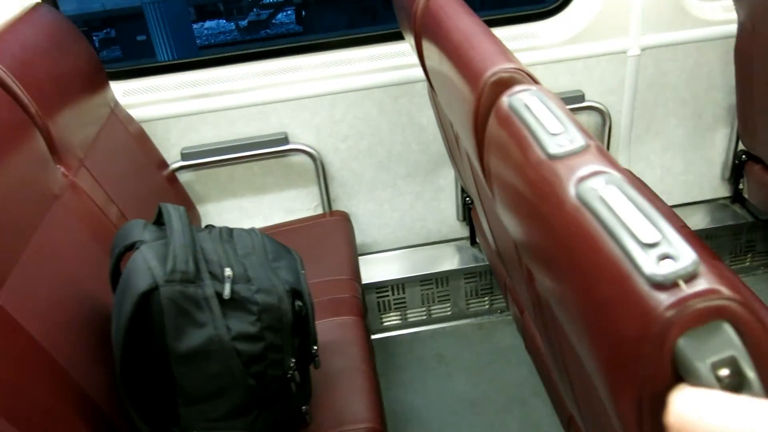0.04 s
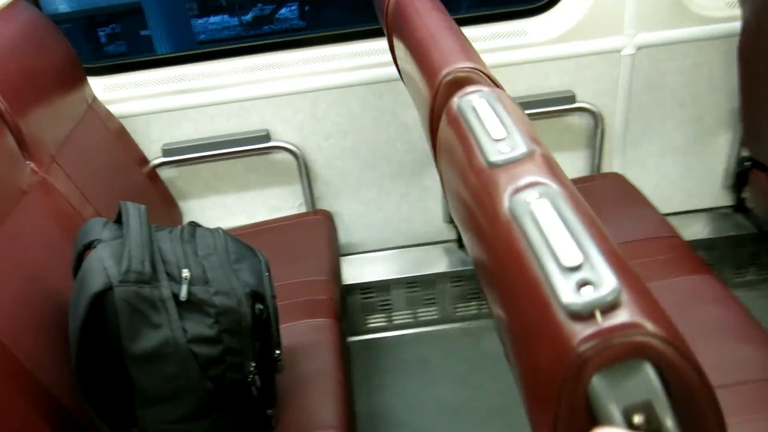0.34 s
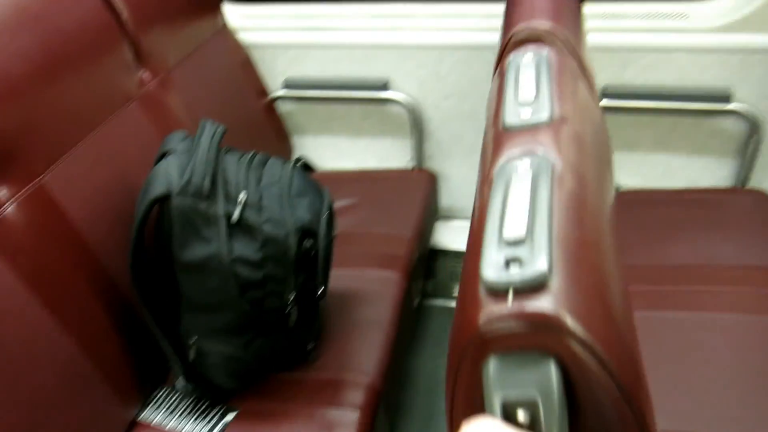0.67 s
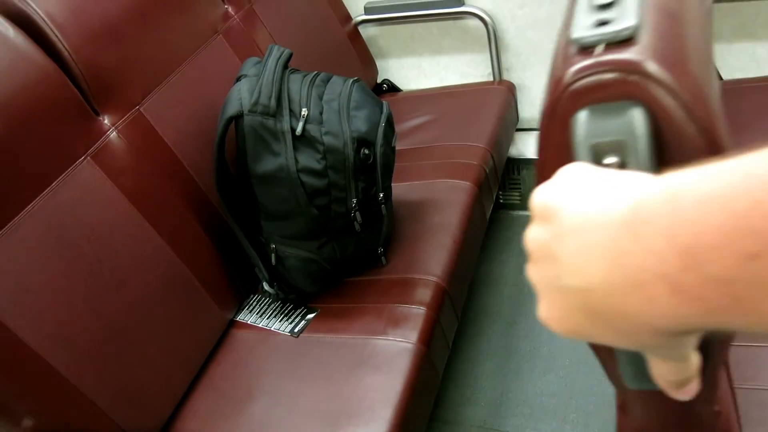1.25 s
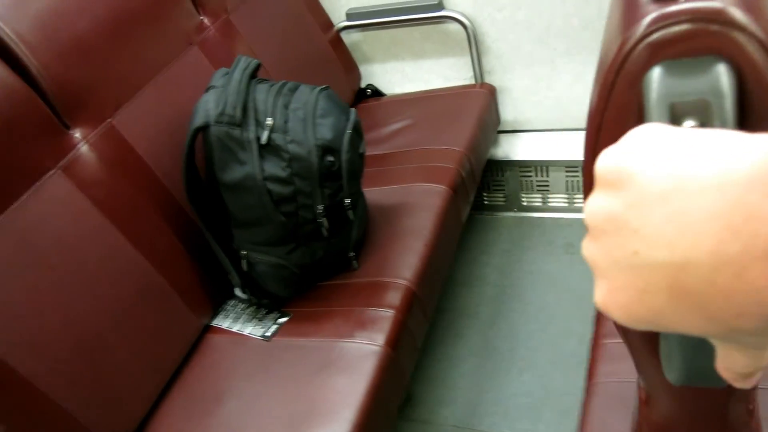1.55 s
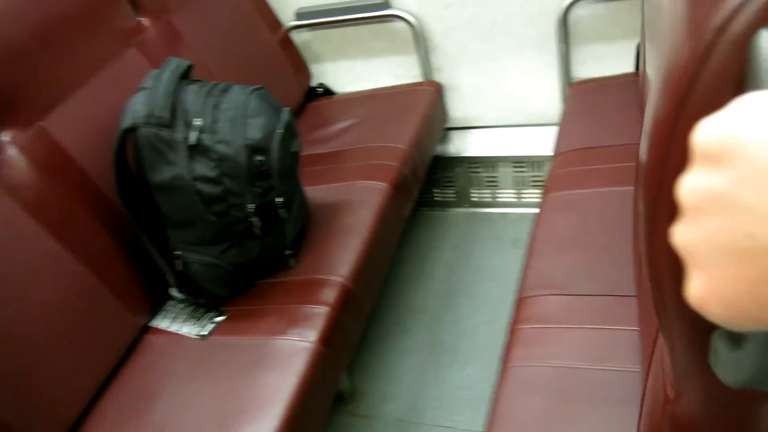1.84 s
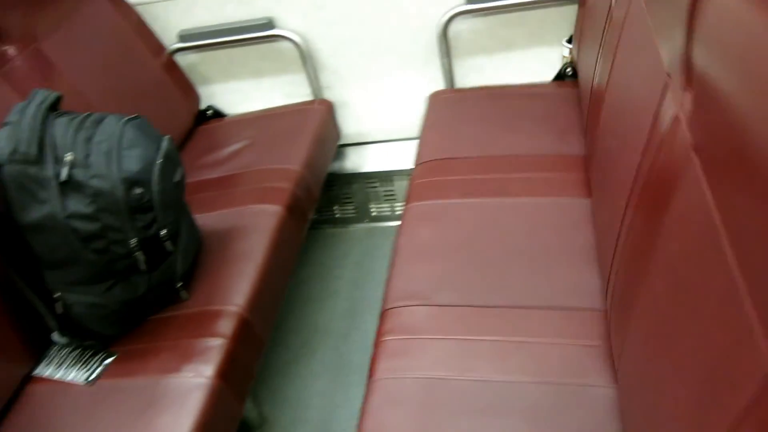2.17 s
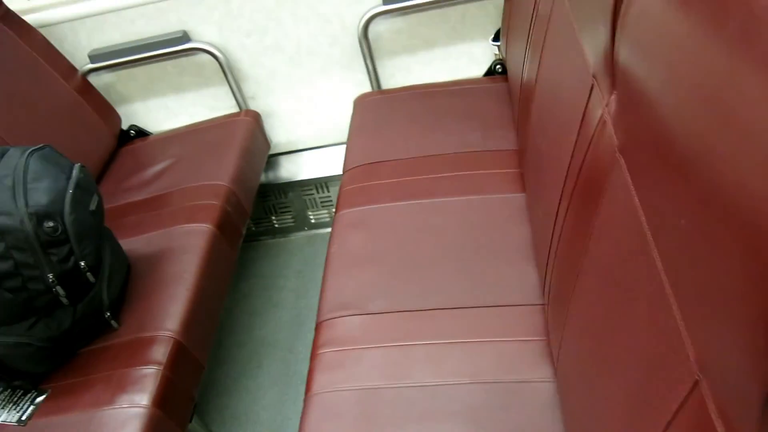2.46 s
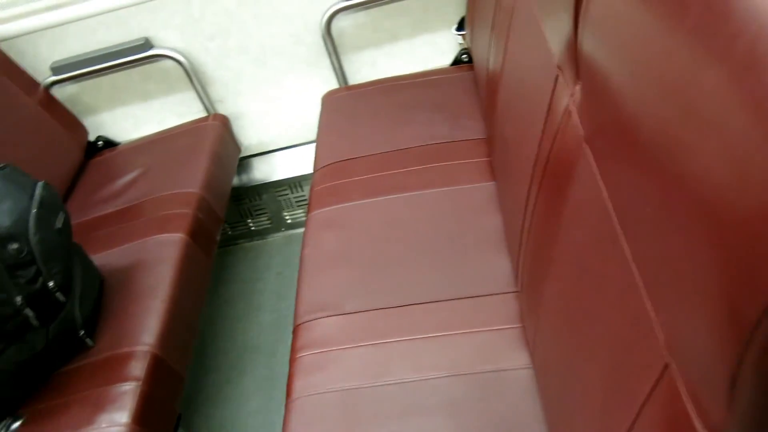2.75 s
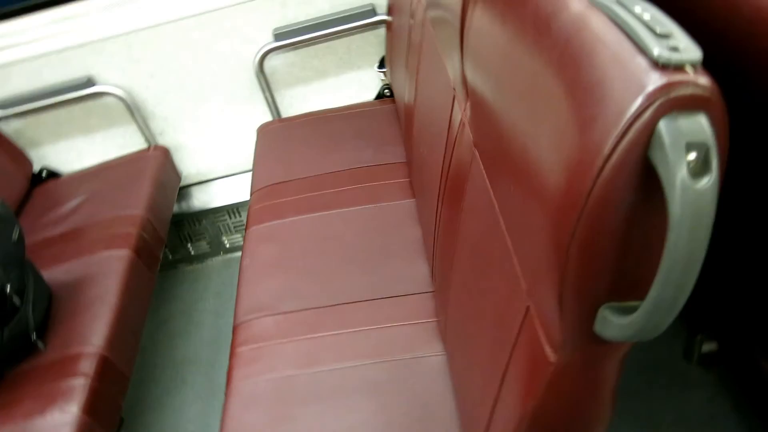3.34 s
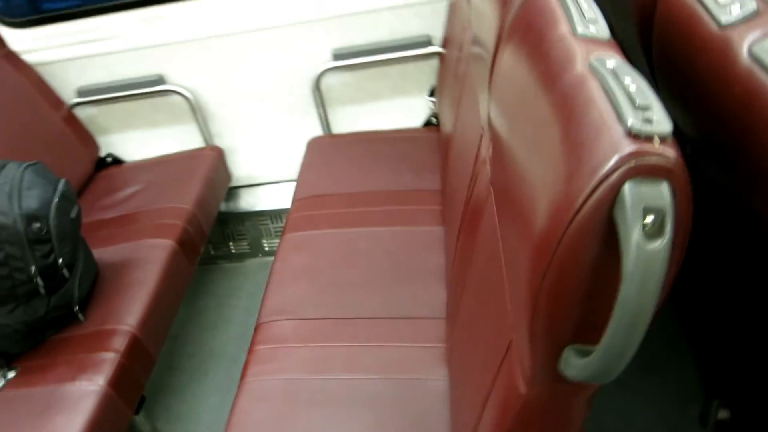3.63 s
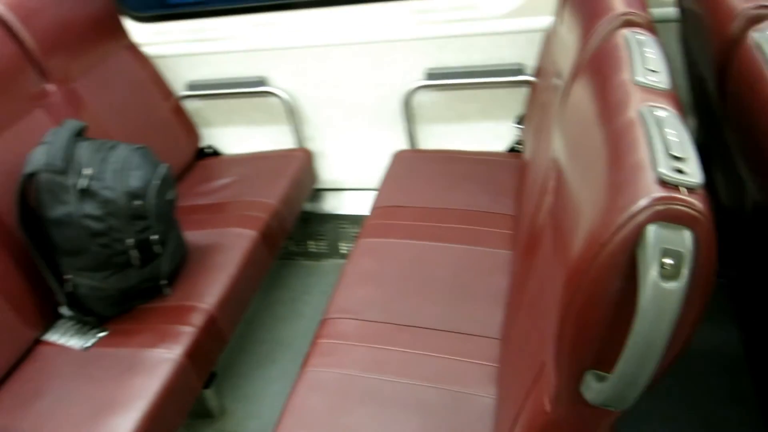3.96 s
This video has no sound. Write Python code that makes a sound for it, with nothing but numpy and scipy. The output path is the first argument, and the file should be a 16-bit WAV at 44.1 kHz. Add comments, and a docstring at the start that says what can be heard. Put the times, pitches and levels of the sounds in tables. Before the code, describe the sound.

A train seat back is swung over, sliding with a faint scrape and a few high squeaks, then landing with a loud rattling clunk and small settling knocks. The moving car rumbles steadily around the nearby microphone.

```python
"""Swinging a train seat back over

Inside a moving rail car, on a camera's stereo microphone, a reversible seat back is swung by its handle.
It slides with a hiss and a scrape, its dry pivots squeal, and it lands with a rattling clunk and settles.
The car rumbles throughout; the camera's gain control ducks it after the squeal and the clunk."""
import sys
import numpy as np
from scipy import signal
from scipy.fft import rfft, irfft
from scipy.io import wavfile
from scipy.ndimage import uniform_filter1d, minimum_filter1d

SR = 44100
rng = np.random.default_rng(int(sys.argv[2]) if len(sys.argv) > 2 else 0)


def dump(signal):
    """Clip the signal to [-1, 1] and save it as 16-bit WAV at the path in sys.argv[1]."""
    limited = np.clip(np.atleast_2d(signal).T, -1, 1)
    pcm = np.round(limited * 32767).astype(np.int16)
    wavfile.write(sys.argv[1], SR, pcm)


N = 176400
BIN_HZ = np.fft.rfftfreq(N, 1 / SR)


def amp(db):
    """Decibels to gain."""
    return 10 ** (np.asarray(db) / 20)


def unit(x):
    """Scales to rms 1."""
    return x / np.sqrt(np.mean(x ** 2) + 1e-20)


def at_hz(points, hz=BIN_HZ):
    """Reads a table on a log-frequency axis."""
    f, value = np.transpose(points)
    return np.interp(np.log(hz + 1), np.log(f + 1), value)


def level(points):
    """Gain over time from points of (time [s], level [dB])."""
    return amp(np.interp(np.arange(N) / SR, *np.transpose(points)))


def add(mix, start_s, sound):
    """Mixes a sound in at its start time."""
    part = mix[..., round(start_s * SR):][..., :sound.shape[-1]]
    part += sound[..., :part.shape[-1]]


def wander(hz):
    """Random motion of rms 1, up to the given rate."""
    return unit(irfft(rfft(rng.standard_normal(N)) / (1 + (BIN_HZ / hz) ** 8), N))


def through(x, response):
    """Convolves with a response scaled to energy 1."""
    response = np.atleast_2d(response)
    return signal.fftconvolve(x, response / np.linalg.norm(response[0]), axes=1)[:, :N]


def colour(points, size=4096):
    """Minimum-phase impulse response with a given spectrum."""
    log_gain = np.log(amp(at_hz(points, abs(np.fft.fftfreq(size, 1 / SR)))))
    return np.fft.ifft(np.exp(np.conj(signal.hilbert(log_gain)))).real[:size // 2]


# Likeness of the two microphone channels: (frequency [Hz], correlation [-1 to 1])
MIC_LIKENESS = [(50, 0.74), (130, 1), (300, 0.84), (600, .5), (1500, 0.37), (4000, .5), (12000, -0.06)]
# Balance at the microphone: (frequency [Hz], left minus right [dB])
MIC_BALANCE = [(40, -1), (250, -3), (700, 1), (4000, 0.5), (12000, -2.5)]


def stereo_noise(gain):
    """Steady noise of rms 1 with a given spectrum, as the stereo microphone hears it."""
    left, independent = rfft(rng.standard_normal((2, N)))
    likeness = np.clip(at_hz(MIC_LIKENESS), -1, 1)
    right = likeness * left + np.sqrt(1 - likeness ** 2) * independent
    tilt = amp(at_hz(MIC_BALANCE) / 2)
    return unit(irfft(np.array([left * tilt, right / tilt]) * gain, N))


# Rumble of the car, heard from inside: (frequency [Hz], relative density [dB])
RUMBLE_SPECTRUM = [(12, -34), (20, -14), (104, -3), (120, -4.5), (154, -8), (198, -0.5), (270, -1.5),
                   (306, -4.5), (431, -12.5), (472, -13), (586, -23), (630, -20.5), (769, -27.5),
                   (888, -26.5), (1500, -42), (1950, -55), (3300, -120)]
# Running gear over the rumble: (frequency [Hz], width [Hz], first level [dB], last level [dB])
GEAR_DRONES = [(112.2, 9.5, -8.5, -17), (240, 34, -8, -12.5), (291, 103, -21, -5.5)]
# Air noise around the microphone: (frequency [Hz], relative density [dB])
AIR_SPECTRUM = [(710, -37), (1200, -6.5), (1320, -5), (1470, -4.5), (2480, -6.5), (2730, -9), (6580, -14.5),
                (14700, -23.5), (16000, -38)]
# Swell of all three together: (time [s], level [dB])
CAR_LEVEL = [(0, -18), (.35, -18), (.8, -16), (1.1, -17), (1.4, -14.5), (1.9, -12.5), (2.4, -18.5),
             (3.0, -19.5), (3.6, -21), (4, -21)]


def running_car(air_db=-21):
    """Rumble, drones and air noise swell and ease together; the drones slowly trade strength."""
    drones = np.zeros((2, N))
    for hz, width_hz, first_db, last_db in GEAR_DRONES:
        resonance = 1 / (1 + (2 * (BIN_HZ - hz) / width_hz) ** 2)
        drones += amp(np.linspace(first_db, last_db, N)) * stereo_noise(resonance)
    rumble = stereo_noise(amp(at_hz(RUMBLE_SPECTRUM)))
    air = amp(air_db) * stereo_noise(amp(at_hz(AIR_SPECTRUM)))
    return level(CAR_LEVEL) * (rumble + drones + air)


# Hiss of the upholstery and lower scrape of the rails: (frequency [Hz], relative density [dB])
HISS_SPECTRUM = [(600, -7), (2200, -0.5), (3200, -3.5), (4800, -0.5), (7500, -6.5), (11500, -3),
                 (15500, -17)]
SCRAPE_SPECTRUM = [(200, -16), (550, 0.5), (1100, 3), (1500, -8), (2200, -5.5), (3200, -20), (8000, -35)]
# Upholstery and rails at the microphone: (time [s], level [dB])
UPHOLSTERY_LEVEL = [(0, -44.5), (.2, -41), (.38, -49.5), (.52, -38), (.7, -35), (.87, -35), (.95, -41.5),
                    (1.02, -41), (1.12, -43), (1.55, -42), (1.8, -35), (1.92, -30), (2.05, -30),
                    (2.15, -3.5), (2.4, -71)]
RAIL_LEVEL = [(0, -46), (.42, -43), (.52, -36.5), (.64, -34.5), (.75, -47), (1.1, -38.5), (1.6, -35),
              (1.85, -32.5), (2.05, -24), (2.3, -67)]


def seat_slide(flicker_db=1, flicker_hz=43):
    """Uneven friction hisses and scrapes while the seat back travels."""
    hiss = level(UPHOLSTERY_LEVEL) * stereo_noise(amp(at_hz(HISS_SPECTRUM)))
    scrape = level(RAIL_LEVEL) * stereo_noise(amp(at_hz(SCRAPE_SPECTRUM)))
    return amp(flicker_db * wander(flicker_hz)) * (hiss + scrape)


# Dry pivots, mostly right of the microphone: (start [s], length [s], first pitch [Hz], last pitch [Hz],
# level [dB], roughness [0-1], second harmonic [dB], third harmonic [dB], left minus right [dB],
# reflections over direct sound [dB])
PIVOT_SQUEALS = [(1.15, 0.018, 4810, 4916, 4.5, 0.42, -11, -13, -0.5, 4),
                 (1.177, 0.033, 4930, 4974, 2, 0.43, -12, -26.5, -2.5, 1.5),
                 (1.208, 0.11, 5050, 4944, -16, 0.27, -21, -45, -3, -2),
                 (1.523, 0.018, 4595, 4410, -33, 0, -1.5, -13, 3, -10.5),
                 (1.55, 0.022, 4530, 4340, -20, 0.12, -10, -20, -1, 4.5),
                 (1.593, 0.082, 4140, 3990, -23.5, .06, -9.5, -28, -2, 2),
                 (1.998, .035, 4704, 4720, -23, .5, -34, -30, -0.5, 5.5),
                 (2.072, 0.057, 7950, 7887, -8.5, 0.14, -26, -40, -4, 2),
                 (2.105, 0.034, 8900, 9030, -20, 0.4, -35, -40, -10, 9)]


def pivot_squeals(jitter_hz=300, chatter_hz=765, rise_share=0.27, fall_s=0.01):
    """A pivot sticks and slips at a gliding pitch; roughness shakes its pitch and strength."""
    direct, to_room = np.zeros((2, 2, N))
    for start, length, first_hz, last_hz, db, rough, second_db, third_db, pan_db, room_db in PIVOT_SQUEALS:
        t = np.arange(0, length, 1 / SR)
        jitter = (0.027 * wander(jitter_hz) + 0.058 * wander(chatter_hz))[:len(t)]
        flutter = 1 + 0.44 * rough * wander(chatter_hz)[:len(t)]
        glide_hz = first_hz + (last_hz - first_hz) * t / length
        phase = 2 * np.pi * np.cumsum(glide_hz * (1 + rough * jitter)) / SR
        tone = np.sin(phase) + amp(second_db) * np.sin(2 * phase)
        if 3 * first_hz < SR / 2:
            tone += amp(third_db) * np.sin(3 * phase)
        envelope = np.minimum(t / (rise_share * length), 1) * np.minimum((length - t) / fall_s, 1)
        channel_gain = amp([[db + pan_db / 2], [db - pan_db / 2]])
        squeal = channel_gain * envelope * unit(tone * flutter)
        add(direct, start, squeal)
        add(to_room, start, amp(room_db) * squeal)
    return direct + car_reflections(to_room, likeness=0.15)


# Reverberation inside the car: (frequency [Hz], time to fall 60 dB [s])
CAR_DECAY = [(100, 0.17), (400, 0.19), (1000, 0.51), (2500, .58), (5000, 0.61), (10000, 0.47),
             (15000, 0.58)]


def car_reflections(sound, likeness, gap_s=0.0035):
    """Dense reflections reach the microphone after a short gap, each band dying at its own speed."""
    left, independent = rng.standard_normal((2, SR))
    right = likeness * left + np.sqrt(1 - likeness ** 2) * independent
    hz, t, bands = signal.stft([left, right], SR, nperseg=256)
    decay = amp(-60 * t / at_hz(CAR_DECAY, hz)[:, None])
    tail = signal.istft(bands * decay, SR, nperseg=256)[1]
    onset = np.clip(np.arange(tail.shape[1]) / SR / gap_s - 1, 0, 1)
    return through(sound, tail * onset)


# The seat landing and settling, centred on the microphone: (time [s], level [dB], relative thud [dB],
# relative clash [dB], rattle decay [s], hollow note [Hz], relative hollow level [dB])
SEAT_KNOCKS = [(1.925, -23.5, -2, -9, 0.023, 845, -2), (2.018, -18, 1, -21, 0.019, 1090, -1),
               (2.072, -8, -2.5, -34, 0.0022, 833, 2.5), (2.116, -23.5, -23, 10, .014, 1106, -33.5),
               (2.129, -1.5, -4, 3, 0.019, 2123, -6.5), (2.141, 2, -2.5, 1, 0.0098, 680, -1),
               (2.150, 3, 5.5, -12.5, 0.0052, 370, -6.5), (2.195, -2, 5, -11, 0.016, 304, -3),
               (2.208, 1, -5, -33, 0.0061, 1075, -4), (2.290, -12.5, -25, 5.5, 0.017, 1120, -27),
               (2.447, -14, 4, -17, 0.038, 558, 1.5), (2.568, -21.5, -4.5, -16, 0.015, 730, -2.5),
               (2.592, -19, 3, -18.5, 0.011, 1150, -3), (2.691, -26.5, 0, -12.5, 0.015, 760, 2),
               (2.866, -30.5, 4, -21, 0.019, 644, 4), (3.624, -31, 3, -11, 0.031, 1300, -16)]
# Ringing of the seat frame: (frequency [Hz], relative level [dB], time to fall 60 dB [s])
FRAME_MODES = [(627, -7, .3), (790, 9, .22), (860, -26, .22), (1060, -3, .35), (1156, 6, 0.13),
               (1330, -20.5, .35), (1430, -2.5, .22), (1730, -11, .2), (1864, 2, .25), (2200, -25, .18),
               (2240, -20, .13), (2660, -4, .12), (4140, -6, .18), (5636, -7, 0.18)]
# Clack of the frame, thud of the cushion, clash of metal: (frequency [Hz], relative density [dB])
FRAME_CLACK = [(40, -38.5), (130, -26), (400, -2.5), (750, 5), (1100, 4.5), (1400, 0.5), (2300, -2.5),
               (3100, -12.5), (5000, -11.5), (9000, -31.5), (16000, -38.5)]
CUSHION_THUD = [(30, -38.5), (70, -22), (130, -8.5), (200, -6), (320, 2.5), (460, -0.5), (600, -17),
                (2000, -33.5), (8000, -77)]
METAL_CLASH = [(1000, -7), (3000, 5.5), (4300, 6.5), (5800, 10), (7500, 3), (10000, 0.5), (13000, -3.5),
               (16000, -16)]


def seat_knocks(rise_s=0.0039, hollow_decay_s=0.0014, width=0.33, grain_db=2.5, ring_db=-14, room_db=1):
    """Each knock is a quickly dying rattle that drives frame, hollow panel, cushion and loose metal."""
    frame, cushion, metal, hollow = np.zeros((4, 2, N))
    t = np.arange(SR // 5) / SR
    for start, db, thud_db, clash_db, decay_s, hollow_hz, hollow_db in SEAT_KNOCKS:
        mid, side, contact_size = rng.standard_normal((3, len(t)))
        grain = amp(grain_db * unit(uniform_filter1d(contact_size, size=40)))
        contacts = unit(np.array([mid + width * side, mid - width * side]) * grain)
        blow = amp(db) * contacts * np.minimum(t / rise_s, np.exp((rise_s - t) / decay_s))
        panel = t * np.exp(-t / hollow_decay_s) * np.sin(2 * np.pi * hollow_hz * t)
        add(frame, start, blow)
        add(cushion, start, amp(thud_db) * blow)
        add(metal, start, amp(clash_db) * blow)
        add(hollow, start, amp(hollow_db) * through(blow, panel))
    t = np.arange(SR) / SR
    modes = sum(amp(db - 60 * t / t60) * np.sin(2 * np.pi * hz * t) for hz, db, t60 in FRAME_MODES)
    ring = amp(ring_db) * through(frame, modes)
    clack = through(frame, colour(FRAME_CLACK))
    thud = through(cushion, colour(CUSHION_THUD))
    clash = through(metal, colour(METAL_CLASH))
    direct = hollow + clack + ring + thud + clash
    return direct + amp(room_db) * car_reflections(direct, likeness=0.49)


def scene():
    """The seat and the car around it, as they reach the microphone."""
    return running_car() + seat_slide() + pivot_squeals() + seat_knocks()


def lag(x, time_constant_s):
    """One-pole smoothing."""
    pole = np.exp(-1 / (time_constant_s * SR))
    return signal.lfilter([1 - pole], [1, -pole], x)


def gain_control(sound, limit_db=-13, sense_s=0.0051, attack_s=0.0036, hold_s=0.14, recover_s=1.46):
    """The camera's gain falls fast on a loud sound, holds, then recovers slowly."""
    power = lag((sound ** 2).mean(0), sense_s)
    over_db = np.maximum(10 * np.log10(power + 1e-12) - limit_db, 1e-6)
    half_hold = int(hold_s * SR / 2)
    held_db = -minimum_filter1d(-over_db, 2 * half_hold + 1, origin=half_hold, mode="nearest")
    samples = np.arange(N)
    recovery = np.exp(-samples / SR / recover_s)
    cut_db = lag(np.maximum.accumulate(held_db / recovery) * recovery, attack_s)
    early_cut_db = np.interp(samples + 0.004 * SR, samples, cut_db)  # looks 4 ms ahead
    return sound * amp(-early_cut_db)


def record(dry):
    """Behind the microphone: gain control, clipping and a 16 kHz band limit."""
    clipped = np.clip(gain_control(dry), -1, 1)
    lowpass = signal.firwin(511, 16000, window=("kaiser", 9), fs=SR)
    return signal.oaconvolve(clipped, lowpass[None], "same")


dry = scene()
out = record(dry)
dump(out)
```